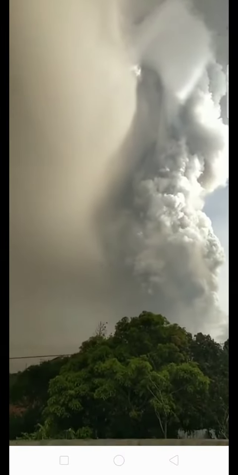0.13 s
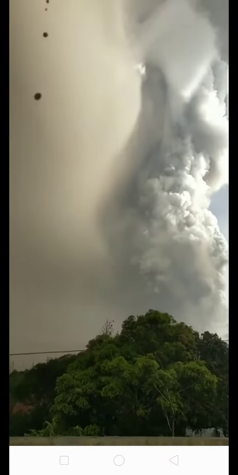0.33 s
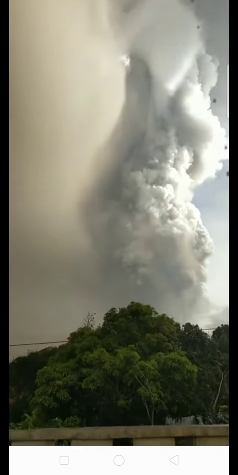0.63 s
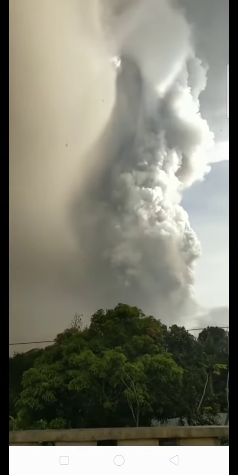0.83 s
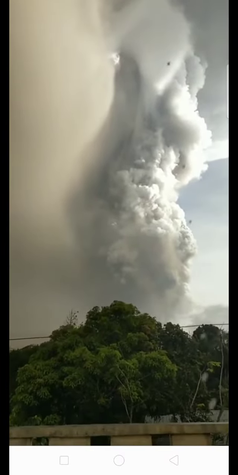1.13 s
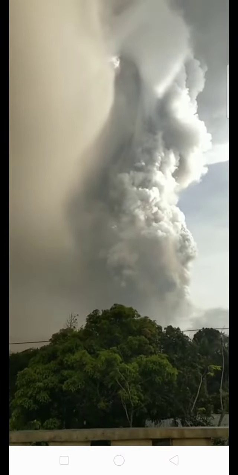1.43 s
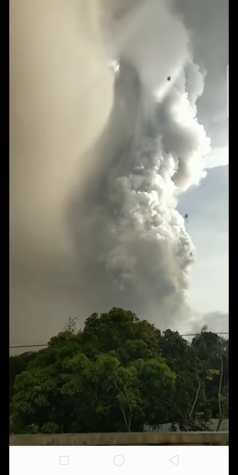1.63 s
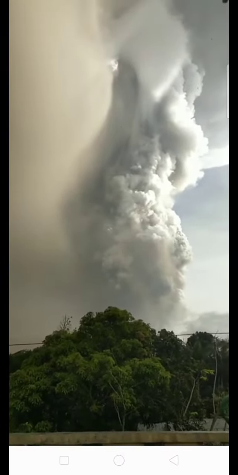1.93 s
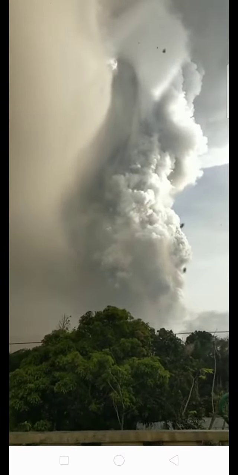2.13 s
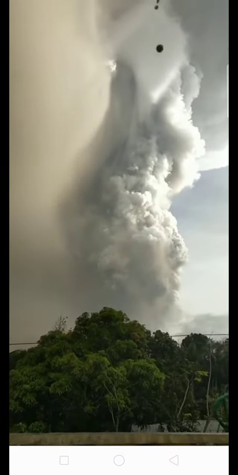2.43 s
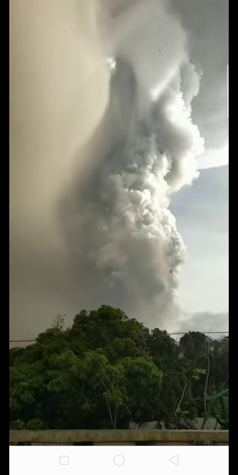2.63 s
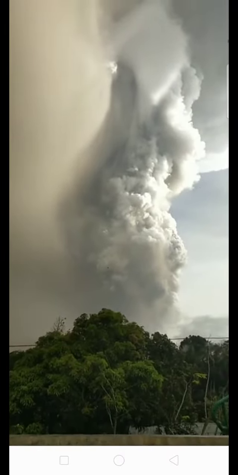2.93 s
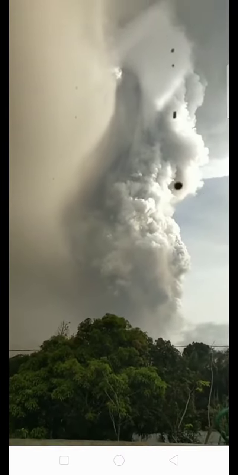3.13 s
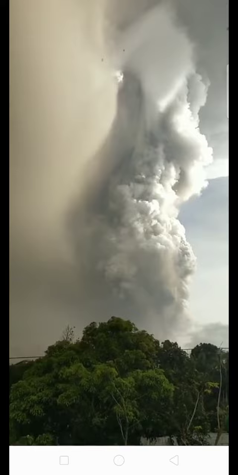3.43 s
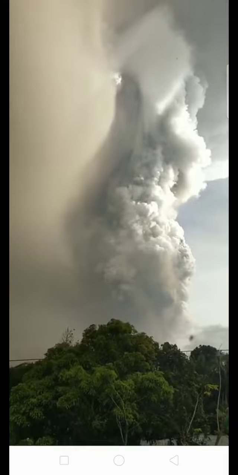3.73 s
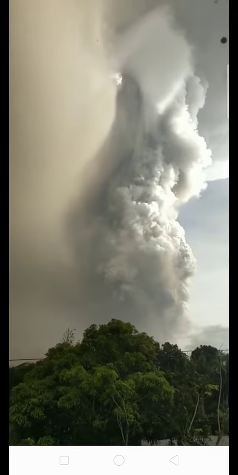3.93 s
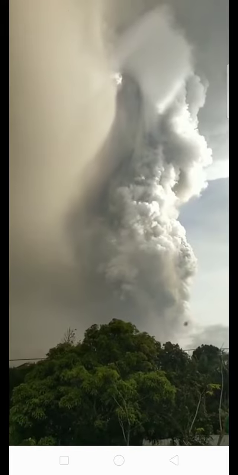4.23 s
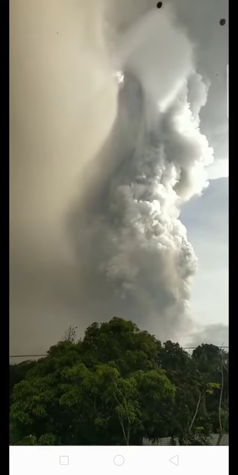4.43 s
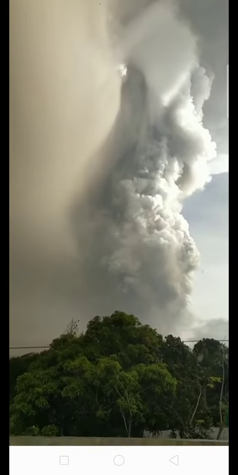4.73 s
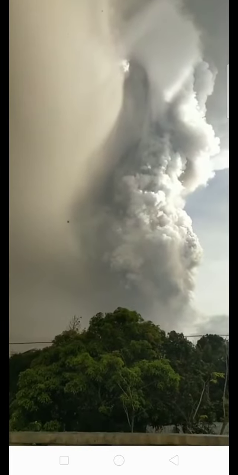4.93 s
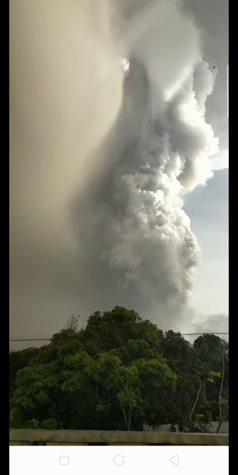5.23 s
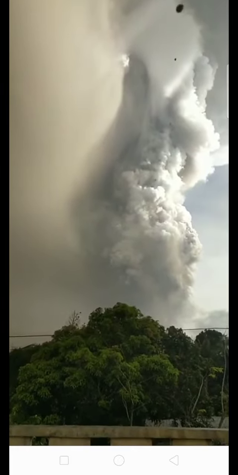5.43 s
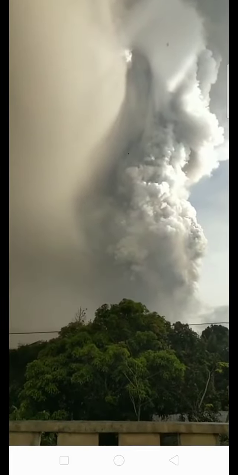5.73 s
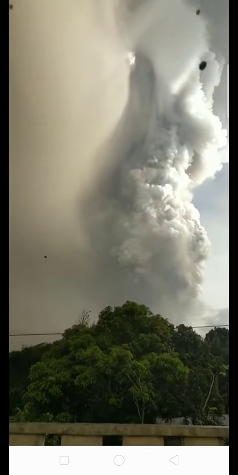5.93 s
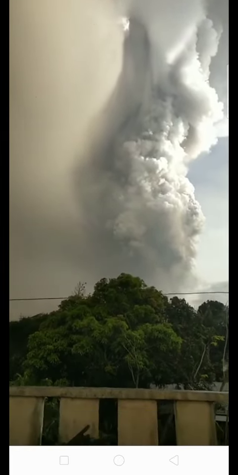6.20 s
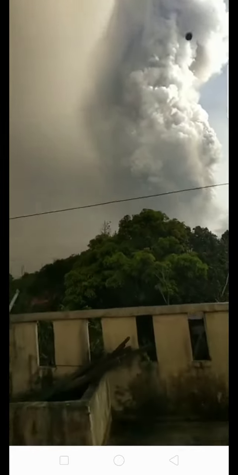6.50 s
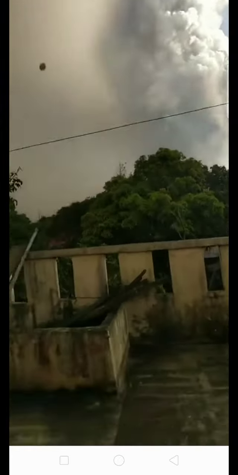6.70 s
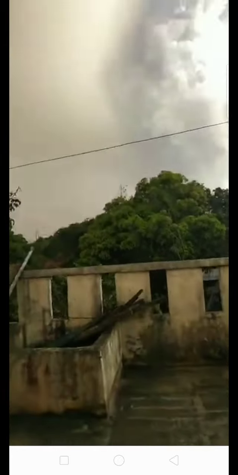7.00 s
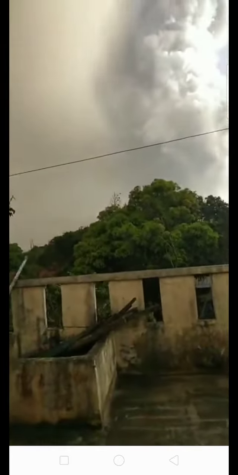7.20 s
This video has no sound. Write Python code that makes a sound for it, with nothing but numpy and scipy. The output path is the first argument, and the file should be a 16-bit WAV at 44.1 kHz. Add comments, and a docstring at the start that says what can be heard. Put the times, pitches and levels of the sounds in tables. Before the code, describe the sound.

A dense, gritty patter of falling mud outdoors, dotted with sharp close splats, crumbling clumps and a few dull thuds.

```python
"""Wet volcanic ash raining on a terrace

Countless far drops on the concrete and the trees around it merge into a gritty hiss.
Close by, clots of mud crack on the floor and spray grit, while loose clumps just crumble.
The heaviest ones thud, and moving air rumbles faintly on the microphone."""
import sys
import numpy as np
from scipy import signal
from scipy.fft import rfft, irfft
from scipy.io import wavfile
from scipy.ndimage import uniform_filter1d, minimum_filter1d

SR = 44100
rng = np.random.default_rng(int(sys.argv[2]) if len(sys.argv) > 2 else 0)


def materialize(psi):
    """Save the field psi as 16-bit PCM at rate SR to the path in sys.argv[1].

    A 1-D psi becomes a single channel; in a 2-D psi each row is a channel.
    """
    bounded = np.clip(np.atleast_2d(psi).T, -1, 1)
    quanta = np.round(bounded * 32767).astype(np.int16)
    wavfile.write(sys.argv[1], SR, quanta)


N = 324561
TIME = np.arange(N) / SR

# Firm clots that crack and spray grit. A "fade" is the time a sound takes to drop by 60 dB.
# t/s, level/dB, fine grit over coarse/dB, crack over spray/dB, spray fade/s
FIRM_CLOTS = [(0.042, -22, -5, 2, .23), (0.16, -28, 4, 9, 0.077), (0.239, -27, -8.5, -5, .35),
              (0.491, -28, -1, 5, 0.26), (0.992, -30, -0.5, 4.5, 0.25), (1.093, -17.5, -16, -1, 0.36),
              (1.367, -15, -12.5, -9, 0.14), (1.679, -22, -11.5, 3, 0.76), (2.166, -23, -7.5, 4, 0.53),
              (2.649, -33.5, -1, 5, 0.59), (3.581, -26.5, -2.5, 14, 0.62), (4.372, -26, 0, -1, 0.38),
              (4.477, -18, -7.5, 3, 0.54), (5.151, -31.5, 8, 1, 0.07), (5.261, -29, -4.5, 1, 1),
              (5.442, -23.5, -4, 0, 0.058), (5.607, -15, -20, -8, .05), (5.773, -26, -9.5, 1, .45),
              (6.477, -27.5, -5.5, 7, 0.36), (7.31, -22.5, -6, 2.5, 0.35)]
# Loose clumps that crumble: t/s, level/dB, fine grit over coarse/dB
LOOSE_CLUMPS = [(0.62, -24.5, -7.5), (2.125, -23.5, -18), (2.75, -25, -10.5), (2.988, -27.5, -6),
                (3.425, -28, -7), (3.969, -29.5, -6.5), (4.326, -22, -14), (5.925, -41, 5.5),
                (6.02, -23, -12), (6.204, -17.5, -21), (7.015, -27.5, -6.5), (7.11, -27.5, -10)]
# Heavy clots that thud: t/s, peak level/dB
HEAVY_CLOTS = [(0.159, -30), (1.048, -37), (1.097, -33), (1.628, -33), (2.168, -34), (2.745, -40),
               (3.582, -9.5), (4.337, -30.5), (4.481, -24), (4.531, -34), (6.476, -28.5)]
# The tones a heavy clot rings with: f/Hz, level/dB, fade/s
THUD_TONES = [(112, -8, 0.039), (160, -8, 0.029), (299, -4.5, 0.035), (484, 5.5, 0.02), (613, -1, 0.023),
              (900, -14, .02), (1350, -14, .015)]
# How hard the ash falls: t/s, level/dB
ASH_FALL = [(0.0, -38), (0.35, -40.5), (0.76, -36), (1.05, -36.5), (1.86, -39.5), (3.05, -36.5),
            (3.44, -36), (3.71, -38), (3.99, -39.5), (4.47, -36.5), (4.73, -38), (5.35, -36), (5.72, -38),
            (6.19, -37), (6.58, -40.5), (6.72, -40), (7.09, -35.5), (7.36, -37.5)]
# Brief dips in the hiss and patter: t/s, level change/dB, half width/s
LEVEL_DIPS = [(1.088, -6.5, 0.0061), (5.594, -8.5, 0.0074)]
# How hard the breeze blows on the microphone: t/s, level/dB
BREEZE_LEVELS = [(0.0, -57.5), (0.33, -61.5), (0.96, -60.5), (1.8, -66), (3.34, -62), (3.94, -69.5),
                 (4.3, -64), (4.57, -54), (4.86, -65), (6.23, -62.5), (6.68, -65.5), (7.36, -57)]
# A "colour" says how strong a sound is from bass to treble: f/Hz, level/dB
CLOT_CRACK_COLOUR = [(100, -35), (800, -15.5), (1600, -8.5), (2500, 8), (3100, 0.5), (4100, -10),
                     (6000, 2.5), (8600, -12.5), (10000, -41), (13500, -33), (15500, -34)]
NEAR_GRIT_COLOUR = [(200, -33.5), (900, -17), (1550, -9.5), (2250, 5), (2900, -2), (4200, -21), (5100, -8),
                    (6300, -6.5), (7500, -19.5), (8600, -20.5), (9800, -47), (11500, -42), (13600, -46),
                    (15000, -61)]
FAR_HISS_COLOUR = [(100, -51.5), (330, -22.5), (590, -15), (760, -21), (1100, -8), (1520, -9), (2200, 1),
                   (2750, -3.5), (4200, -28), (5200, -16), (6200, -15), (8600, -32), (9800, -54),
                   (13500, -61), (15000, -77.5)]
BREEZE_COLOUR = [(20, -10.5), (40, -6.5), (70, 0.5), (150, 1), (230, -0.5), (400, -15), (1000, -41.5)]


def splats(crack_fade_s=0.027):
    """A firm clot cracks as it lands, then its grit rains down around it."""
    cracks = [(start, db + crack_db, crack_fade_s) for start, db, _, crack_db, _ in FIRM_CLOTS]
    impact = landings(cracks, rise_s=0.0002)
    crumbs = clicks(per_second=9000, spread_db=2)
    crack = ring_with(impact * crumbs, make_ring(CLOT_CRACK_COLOUR))
    sprays = [(start, db, fine_db, fade_s) for start, db, fine_db, _, fade_s in FIRM_CLOTS]
    return crack + grit_spray(sprays, rise_s=0.0016, echo_gain=0.29)


def crumbles(fade_s=0.72):
    """A loose clump lands softly, with no crack, and its grit trickles on."""
    sprays = [(start, db, fine_db, fade_s) for start, db, fine_db in LOOSE_CLUMPS]
    return grit_spray(sprays, rise_s=0.0015, echo_gain=0.49)


def grit_spray(sprays, rise_s, echo_gain):
    """Grit rains down after each landing: coarse bits sound low, fine bits sound high."""
    starts = np.sort([row[0] for row in sprays])
    grit = floor_echo(clicks(per_second=4400, spread_db=2.5), starts, echo_gain)
    low_ring, high_ring = split_ring(NEAR_GRIT_COLOUR)
    coarse = landings([(start, db, fade_s) for start, db, _, fade_s in sprays], rise_s)
    fine = landings([(start, db + fine_db, fade_s) for start, db, fine_db, fade_s in sprays], rise_s)
    return ring_with(coarse * grit, low_ring) + ring_with(fine * grit, high_ring)


def thuds(full_blow_contact_s=0.00012):
    """Heavy clots set off short tones; a weaker blow pushes longer and softer, leaving only the bass."""
    track, age = np.zeros(N), TIME[:8192]
    ring = sum(undb(db) * np.cos(2 * np.pi * hz * age) * undb(-60 * age / fade_s)
               for hz, db, fade_s in THUD_TONES)
    for start, peak_db in HEAVY_CLOTS:
        contact_s = full_blow_contact_s / undb(peak_db) ** 0.89
        push = age * np.exp(-2 * np.pi * age / contact_s)
        thud = ring_with(push, ring)
        add(track, start, undb(peak_db) * thud / np.abs(thud).max())
    return track


def patter(fall_db, gain_db=0.5):
    """Small drops land a few steps away, each with a tiny scatter of grit."""
    drops = clicks(per_second=70, spread_db=2) * undb(fall_db)
    drop_power = burst(rise_s=0.00034, fade_s=0.04) ** 2
    scatter_power = ring_with(drops ** 2, drop_power / drop_power.sum())
    scatter = np.sqrt(np.abs(scatter_power))
    grit = clicks(per_second=6000, spread_db=4.5)
    echo_changes = np.sort(rng.choice(TIME, size=100))
    grit = floor_echo(grit, echo_changes, echo_gain=0.71)
    low_ring, high_ring = split_ring(NEAR_GRIT_COLOUR)
    return undb(gain_db) * ring_with(scatter * grit, low_ring + undb(-10) * high_ring)


def far_hiss(fall_db, gain_db=9.5):
    """Far drops merge into a hiss; coarse and fine grit swell together but flicker on their own."""
    drops = clicks(per_second=7000, spread_db=1) * undb(fall_db + 0.37 * wobble(per_second=16))
    low_ring, high_ring = split_ring(FAR_HISS_COLOUR)
    coarse = ring_with(drops * undb(0.78 * wobble(per_second=30)), low_ring)
    fine = ring_with(drops * undb(0.65 * wobble(per_second=15)), high_ring)
    return undb(gain_db) * (coarse + undb(-12) * fine)


def breeze(gain_db=1):
    """Light, uneven puffs of air rumble on the microphone."""
    breeze_db = np.interp(TIME, *np.transpose(BREEZE_LEVELS))
    puffs = undb(breeze_db + gain_db + 2.6 * wobble(per_second=28))
    return puffs * ring_with(rng.standard_normal(N), make_ring(BREEZE_COLOUR))


def floor_echo(sound, starts, echo_gain):
    """Each landing place has its own short echo off the floor, and so its own hollow colour."""
    delays = rng.integers(SR // 2000, SR // 500, len(starts) + 1)  # 0.5 to 2 ms
    delay_now = delays[np.searchsorted(starts, TIME)]
    echo = sound[np.maximum(np.arange(N) - delay_now, 0)]
    return (sound + echo_gain * echo) / np.hypot(1, echo_gain)


def landings(rows, rise_s):
    """One loudness curve for many bursts, given as rows of t/s, level/dB, fade/s."""
    power = np.zeros(N)
    for start, db, fade_s in rows:
        add(power, start, (undb(db) * burst(rise_s, fade_s)) ** 2)
    return np.sqrt(power)


def burst(rise_s, fade_s):
    """A one-second loudness curve that jumps up and dies away."""
    age = TIME[:SR]
    decay = np.minimum(np.log(1000) * age / fade_s, 20)
    return (1 - np.exp(-age / rise_s)) * np.exp(-decay)


def clicks(per_second, spread_db):
    """Tiny hits of uneven size at random times."""
    chance, size, sign = rng.random((3, N))
    strength = undb(spread_db * np.sqrt(12) * size)
    lands = chance < per_second / SR
    return normalise(lands * np.copysign(strength, sign - 0.5))


def wobble(per_second):
    """Random steps smoothed into a wandering curve, about 1 in size."""
    hold = int(SR / per_second)
    steps = np.repeat(rng.standard_normal(N // hold + 1), hold)
    smooth = uniform_filter1d(uniform_filter1d(steps, hold), hold)
    return normalise(smooth[:N])


def make_ring(colour, size=4096):
    """The short ring that gives a click this colour, scaled to an energy of 1."""
    hz, db = np.transpose(colour)
    grid_hz = np.maximum(np.arange(size // 2 + 1) * SR / size, 1)
    gains = undb(np.interp(np.log(grid_hz), np.log(hz), db))
    # These steps keep the colour but pack the sound at the start (minimum phase).
    cepstrum = irfft(np.log(gains))
    cepstrum[1:size // 2] *= 2
    cepstrum[size // 2 + 1:] = 0
    ring = irfft(np.exp(rfft(cepstrum)))
    return ring / np.sqrt(np.sum(ring ** 2))


def split_ring(colour, split_hz=4000):
    """The low and the high part of a colour's ring, each with an energy of 1."""
    ring = make_ring(colour)
    filters = [signal.butter(4, split_hz, side, fs=SR, output="sos") for side in ("low", "high")]
    parts = [signal.sosfilt(sos, ring) for sos in filters]
    return [part / np.sqrt(np.sum(part ** 2)) for part in parts]


def ring_with(sound, ring):
    """Let every sample of a sound set off its own copy of the ring."""
    return signal.oaconvolve(sound, ring)[:N]


def add(track, start, piece):
    """Mix a piece into a track, beginning at start seconds."""
    room = track[int(start * SR):][:len(piece)]
    room += piece[:len(room)]


def undb(db):
    """Turn decibels into a number to multiply by."""
    return 10 ** (np.asarray(db) / 20)


def normalise(sound):
    """Scale to an average power of 1."""
    return sound / np.sqrt(np.mean(sound ** 2))


def scene():
    """Mix the hiss and patter, the near landings and the breeze into one channel."""
    dips_db = sum(db * np.exp(-((TIME - middle) / width) ** 2) for middle, db, width in LEVEL_DIPS)
    fall_db = np.interp(TIME, *np.transpose(ASH_FALL)) + dips_db
    mix = far_hiss(fall_db) + patter(fall_db) + splats() + crumbles() + thuds() + breeze()
    return mix[None]


def record(dry, limit_db=-9.9, window=160, bottom_hz=55, top_hz=15600):
    """Turn the volume down around the loudest hits, then cut the deep bass and the highest treble."""
    gain = np.minimum(1, undb(limit_db) / (np.abs(dry) + 1e-9))
    gain = uniform_filter1d(minimum_filter1d(gain, window), window)  # eases down just before a hit
    bass_cut = signal.butter(4, bottom_hz, "high", fs=SR, output="sos")
    treble_cut = signal.ellip(8, 0.2, 70, top_hz, fs=SR, output="sos")
    return signal.sosfilt(treble_cut, signal.sosfilt(bass_cut, dry * gain))


dry = scene()
out = record(dry)
materialize(out)
```